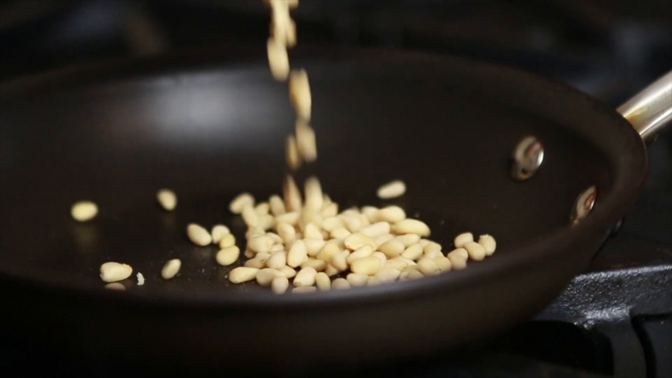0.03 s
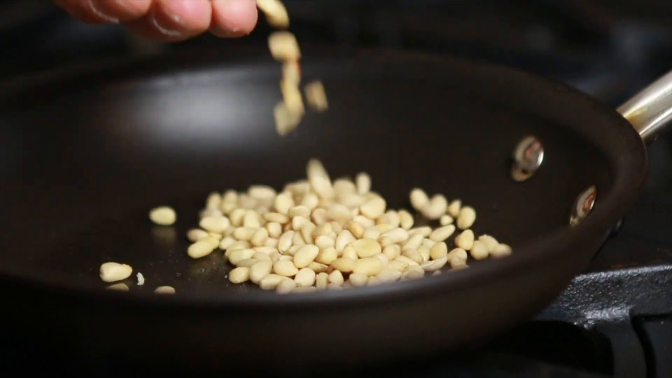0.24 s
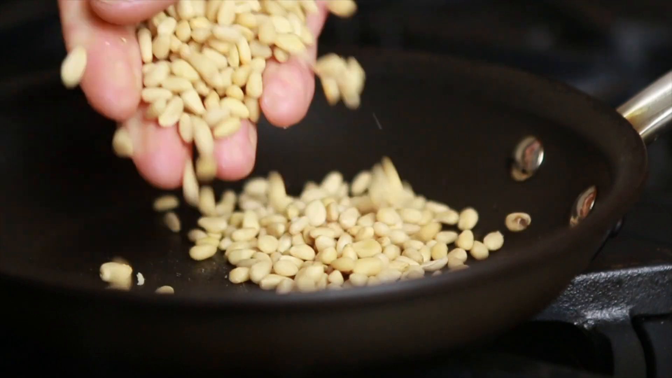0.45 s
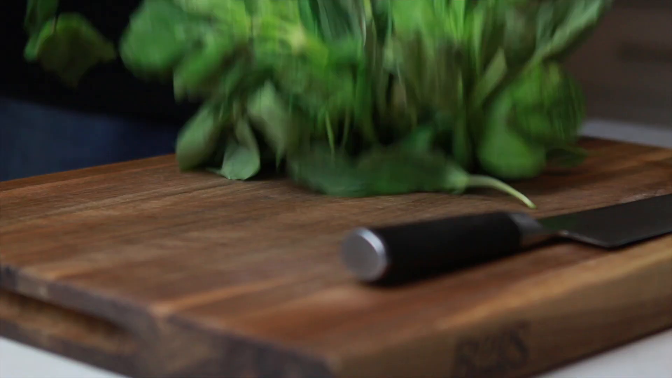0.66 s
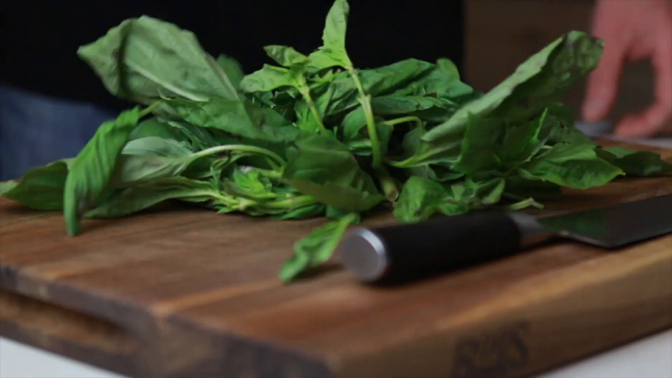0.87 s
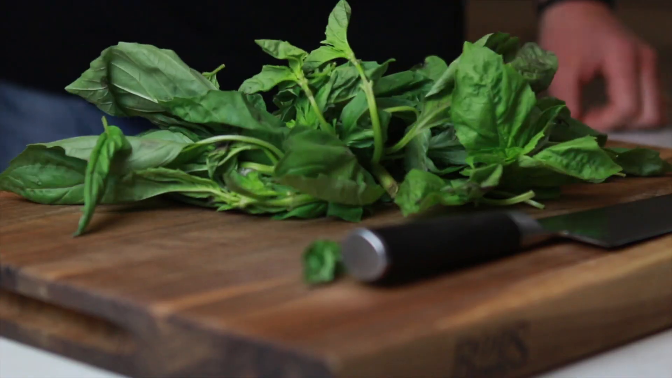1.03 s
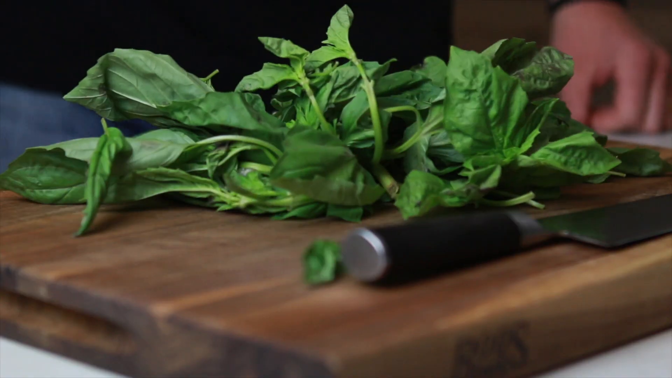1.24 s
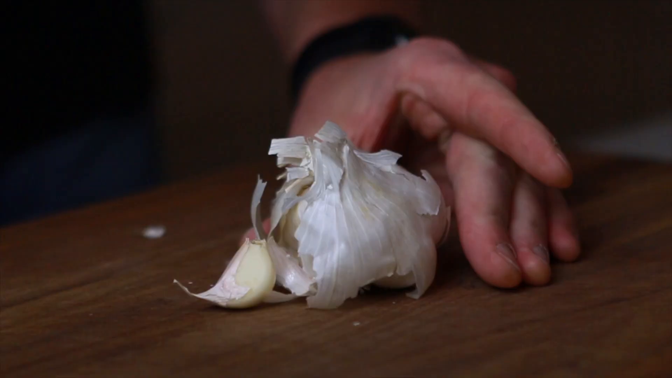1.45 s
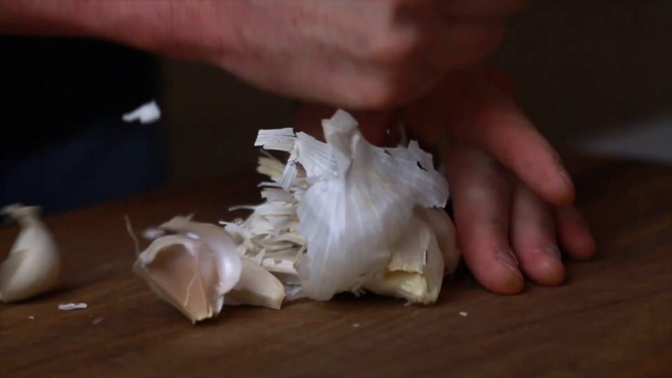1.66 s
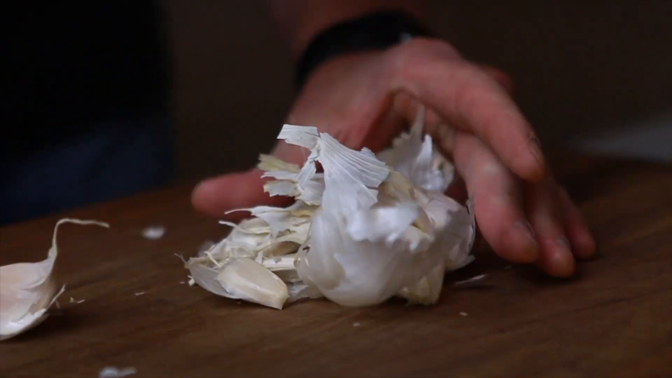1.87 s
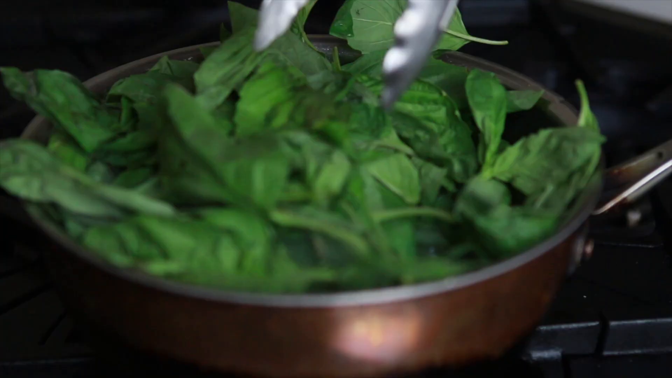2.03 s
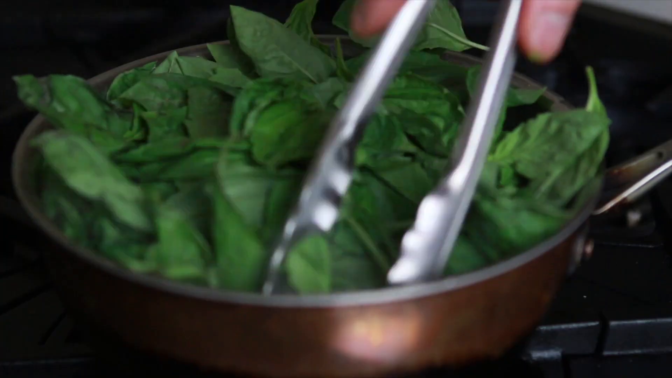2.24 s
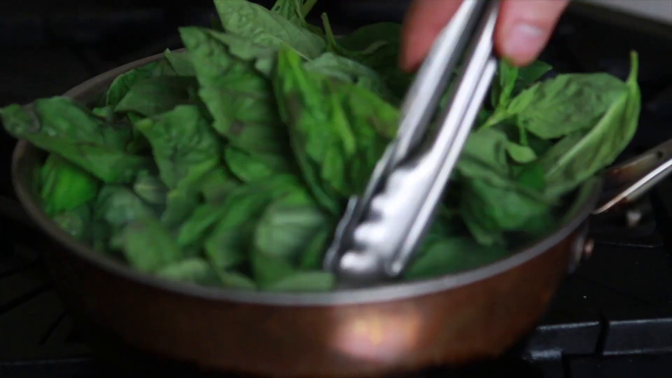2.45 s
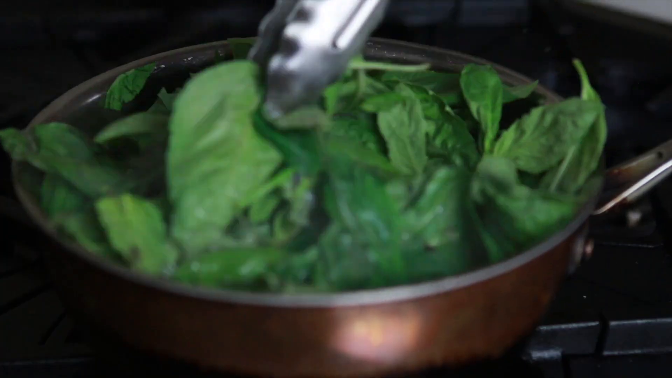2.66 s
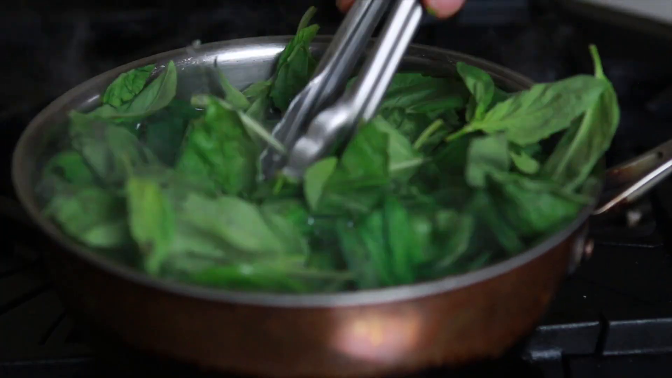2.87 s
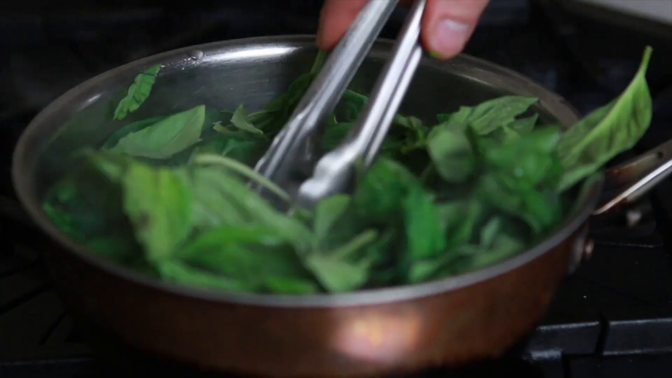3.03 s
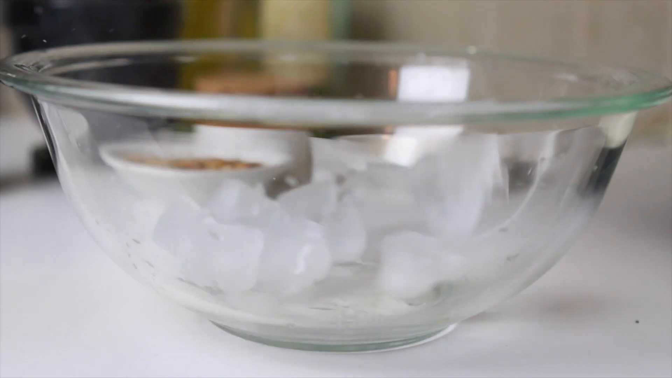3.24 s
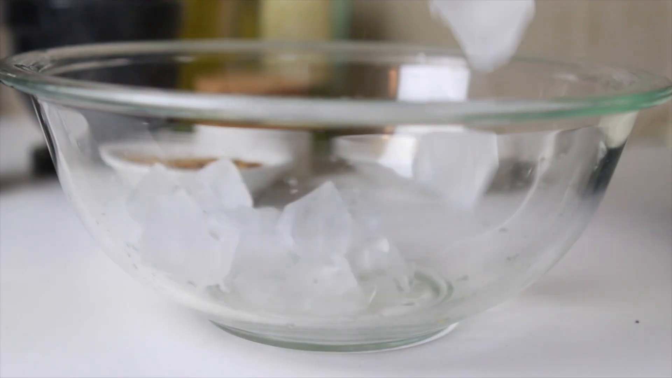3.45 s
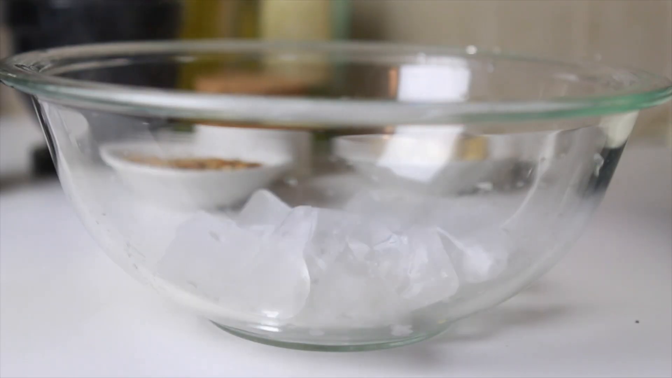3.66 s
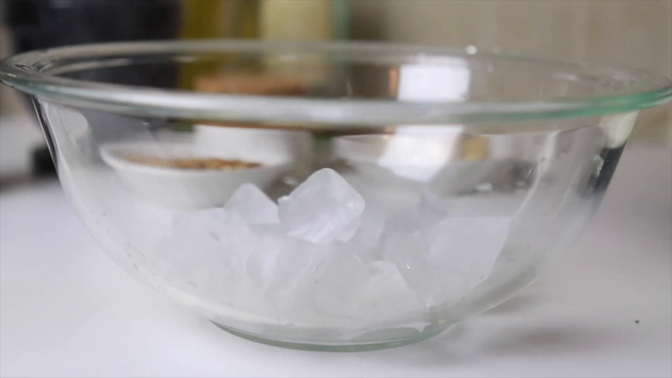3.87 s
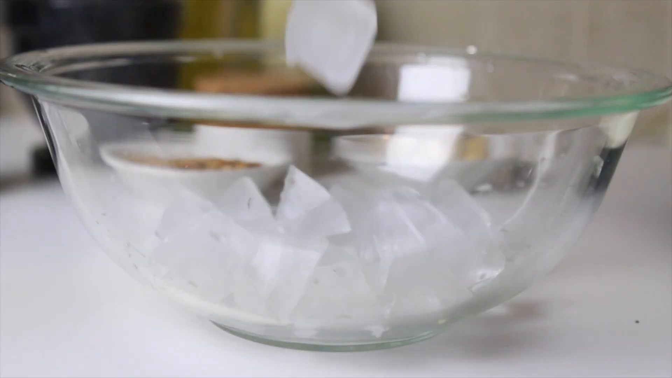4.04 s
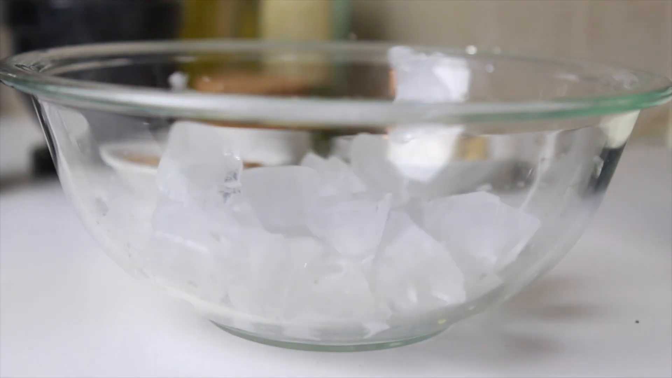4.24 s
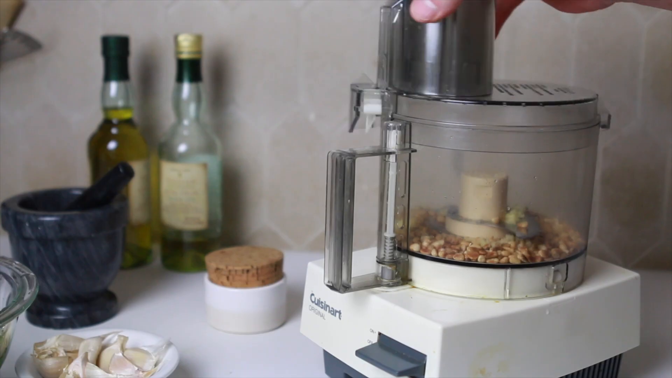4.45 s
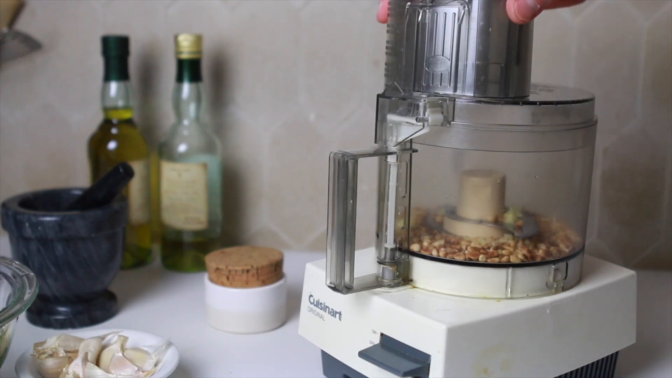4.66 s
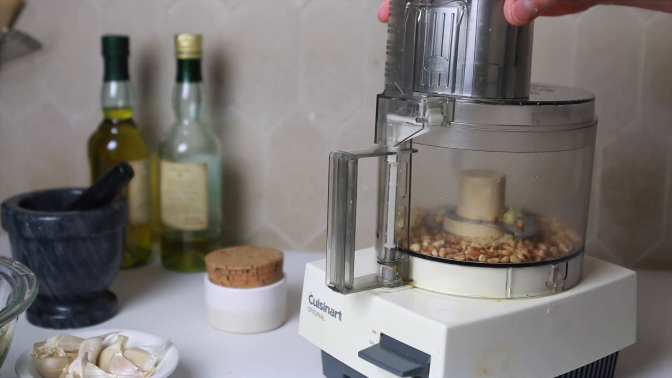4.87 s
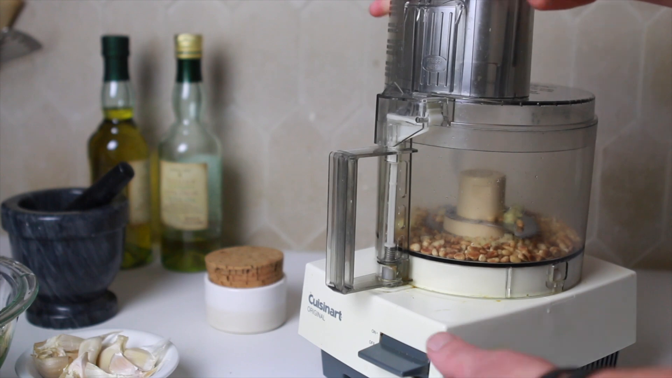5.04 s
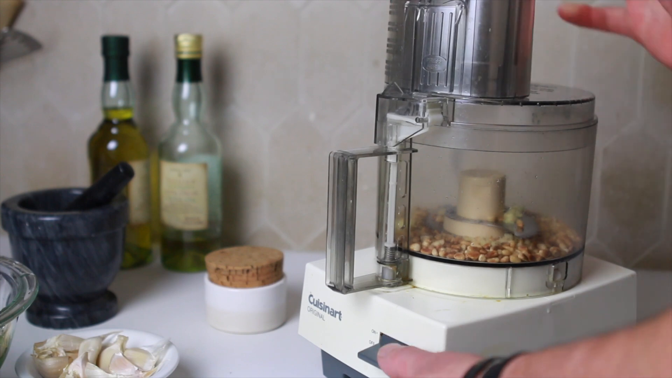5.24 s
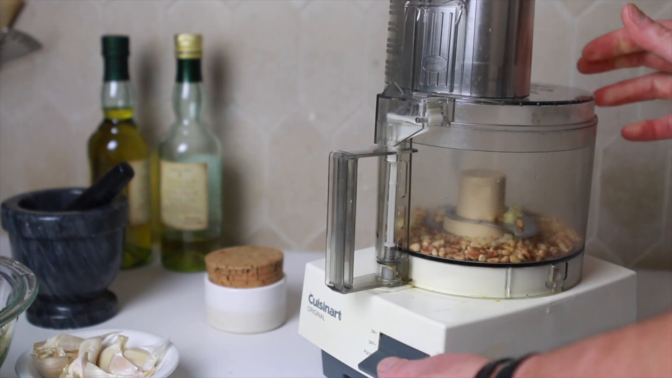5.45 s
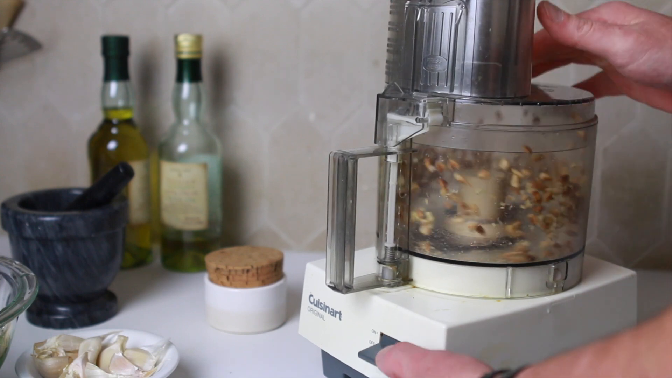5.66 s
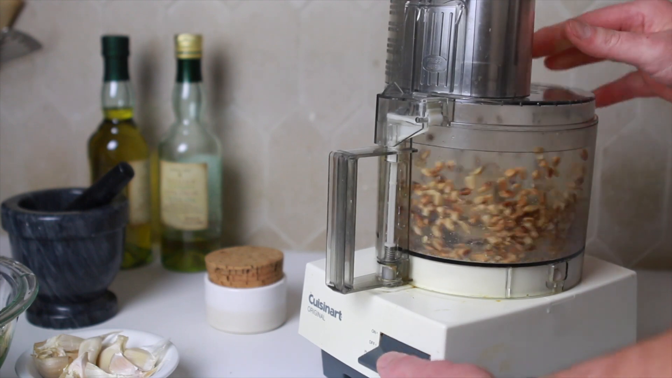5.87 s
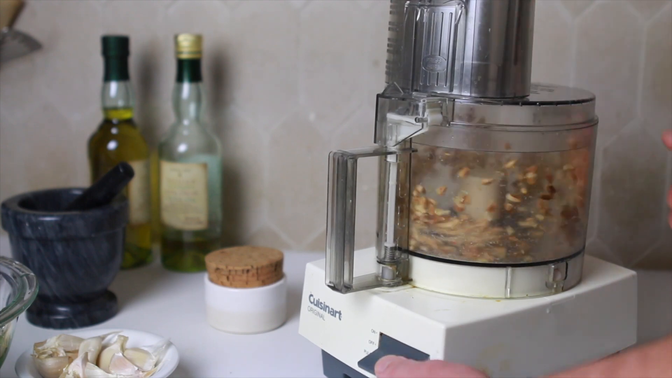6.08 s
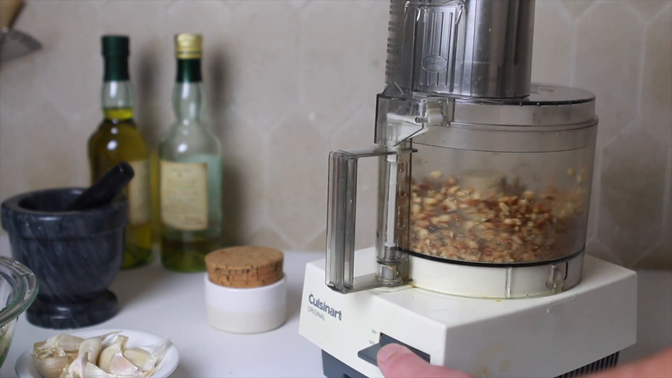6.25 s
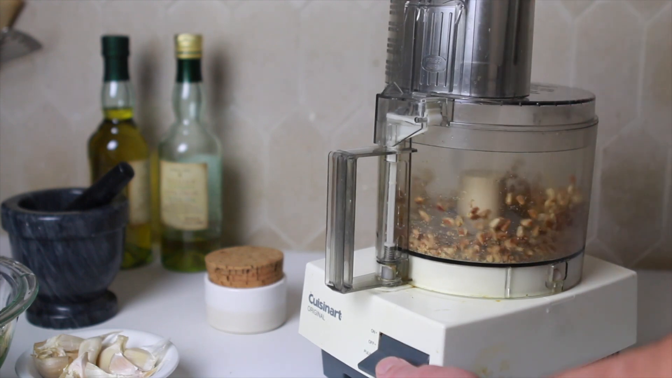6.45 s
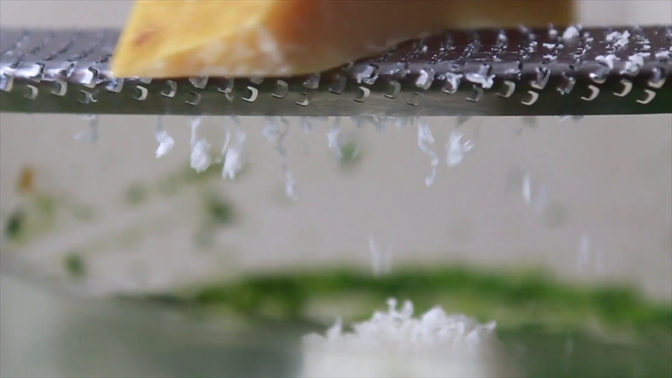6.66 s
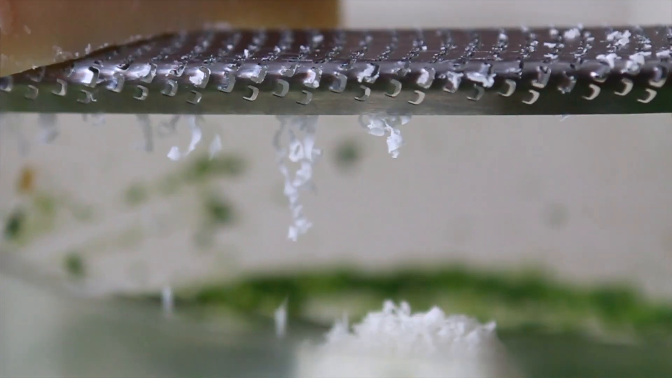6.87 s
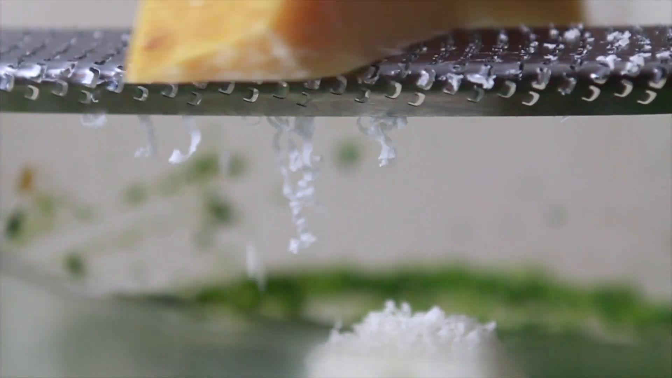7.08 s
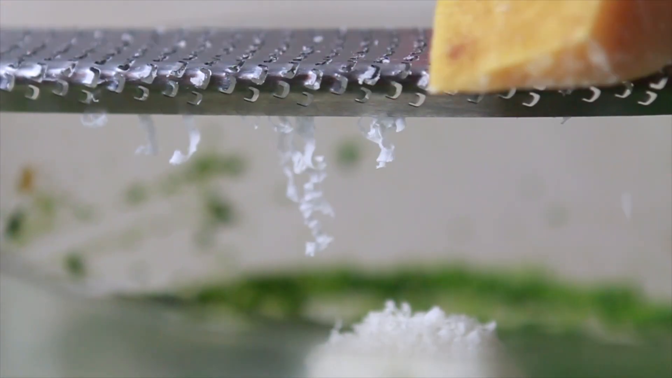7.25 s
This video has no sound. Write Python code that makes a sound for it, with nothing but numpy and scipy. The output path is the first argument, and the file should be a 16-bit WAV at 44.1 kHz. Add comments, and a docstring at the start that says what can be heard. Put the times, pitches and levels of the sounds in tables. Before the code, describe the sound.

Quick close kitchen sounds: pattering nuts, a garlic crack, simmering pan bumps, bright ice clinks, lid snap, two rattling blender bursts, soft grating.

```python
"""Kitchen work in quick succession

Nuts patter into a ringing skillet, basil flops on a board, garlic is crushed, tongs nudge a simmering pan,
ice tumbles into a glass bowl, a food processor is locked and pulsed twice, and cheese is drawn over a grater.
Contacts are clouds of random micro-impacts, coloured by a spectrum or driving resonances; hard bodies ring
as decaying sines, the motor and blades follow one speed curve, and decaying noise forms the room's reverberation.
"""
import sys
import numpy as np
from scipy import signal
from scipy.fft import rfft, irfft
from scipy.io import wavfile
from scipy.ndimage import uniform_filter1d

SR = 44100
rng = np.random.default_rng(int(sys.argv[2]) if len(sys.argv) > 2 else 0)


def store_wav(level_fs):
    """Save 16-bit WAV to argv[1]."""
    pcm = np.round(np.clip(np.atleast_2d(level_fs), -1, 1) * 32767)
    wavfile.write(sys.argv[1], SR, pcm.T.astype(np.int16))


N = 322371
T = np.arange(N) / SR  # seconds
AGE = T[:SR // 2]  # seconds since a contact began
NUTS_END_S, STOVE_START_S, ICE_START_S, ICE_END_S, GRATER_START_S = .652, 2.07, 3.19, 4.448, 6.53

# A relative_db column is further offset where it is used. Every spectrum lists: frequency_hz, level_db.
# Ice cubes striking: start_s, strength_db, clink_brightness_db
ICE_CUBES = [(3.1942, -32.5, -3), (3.206, -35, 6), (3.2287, -26.5, 6.5), (3.261, -27, 5.5),
             (3.2738, -32, 9), (3.3011, -28, 0), (3.325, -25.5, 5), (3.3727, -28.5, 7.5), (3.4193, -33, 5),
             (3.4434, -31.5, 1), (3.4496, -25, 7.5), (3.579, -28, -5), (3.5962, -26.5, -0.5),
             (3.6378, -25.5, 1), (3.6534, -27, -15), (3.736, -24.5, -7), (3.7439, -32, -14),
             (3.8794, -27.5, -4), (3.909, -31, -5), (3.9282, -37, -1), (4.007, -40.5, 13.5),
             (4.0349, -28, -7), (4.0464, -27, -3), (4.1041, -34, 3.5), (4.1707, -31.5, -14),
             (4.201, -32, -3), (4.2897, -30, -5.5), (4.313, -27.5, -3), (4.3375, -33.5, 1),
             (4.3511, -25.5, -18), (4.4167, -32.5, -4), (4.4406, -34.5, 1)]
# Spectra of the rattling ice heap and of the bowl's knock: frequency_hz, level_db
ICE_RATTLE_SPECTRUM = [(25, -30.5), (80, -16.5), (250, -14.5), (880, -1.5), (1400, -11), (3500, -7),
                       (7500, -11.5), (15500, -40)]
ICE_KNOCK_SPECTRUM = [(60, -53), (130, -11.5), (250, -26), (450, -6.5), (650, 0), (900, 3.5), (1150, -5),
                      (1700, -19), (4000, -53)]
# High modes of the glass bowl: pitch_hz, level_db, t60_s
GLASS_MODES = [(5600, -11, 0.11), (6880, 6.5, 0.1), (7350, 8.5, 0.16), (7330, 9.5, .1), (7950, -9, 0.17),
               (8960, 1, 0.12), (9900, -12.5, 0.3), (12370, -14, 0.32), (13130, -11, 0.22),
               (15570, -11, .15)]
# Blows on the bare bowl wall: start_s, first_mode_db, second_mode_db
WALL_BLOWS = [(3.231, -39, -35.5), (3.262, -40, -33.5), (3.463, -30, -32.5), (3.739, -32.5, -37),
              (4.008, -37.5, -39.5), (4.209, -42.5, -38), (4.351, -44, -38)]
# The wall's two lowest modes: pitch_hz, t60_s
WALL_MODES = [(1405.5, .9), (2617, .33)]
# Cubes squeaking as they slide: start_s, level_db, pitch_hz, length_s
ICE_SQUEAKS = [(3.279, -25.5, 3850, 0.038), (3.346, -25, 3840, 0.037), (3.414, -23, 4160, 0.013),
               (3.435, -27, 4090, 0.053), (3.544, -33, 3730, 0.02), (3.57, -33.5, 3540, 0.13)]
# High-pass keeping the ice and bowl sounds free of bass: frequency_hz, level_db
ICE_HIGH_PASS = [(20, -22), (60, -10), (120, 0), (16000, 0)]
# Presses of the pulse switch: on_s, off_s, first_bite_relative_db, cutoff_jolt_relative_db
PULSES = [(5.565, 5.797, -15, -41.5), (6.034, 6.23, -20, -32.5)]
# Resonances of the plastic jug: centre_hz, width_hz, level_db
JUG_RESONANCES = [(1810, 140, -5), (2420, 33, -12), (2610, 110, 3), (2740, 44, 4), (2960, 25, -5),
                  (3690, 52, 2.5), (3880, 25, -12), (4930, 150, -3)]
# Spectra of the chopped nuts and of the motor: frequency_hz, level_db
CHOP_SPECTRUM = [(200, -35), (450, -22.5), (850, -12), (1300, -10), (1800, -5), (2700, 1.5), (3900, -2),
                 (6400, -6), (8500, -13), (10500, -28.5), (15500, -39)]
MOTOR_SPECTRUM = [(30, -35), (70, -1.5), (140, -24), (230, -1), (300, -7.5), (378, 3), (450, -10),
                  (700, -10), (1500, -48)]
# Plastic lid and lever clicking: start_s, click_relative_db
LID_CLICKS = [(4.4554, -38.5), (4.526, -31.5), (4.5452, -38), (4.5695, -36), (4.591, -25), (4.6084, -23.5),
              (4.6352, -23), (4.6744, -15.5), (4.6884, -7.5), (4.6976, -19.5), (5.1376, -46),
              (5.1616, -36.5)]
# Switch ticks: start_s, level_db
SWITCH_TICKS = [(5.329, -55), (5.410, -58.5), (5.509, -61), (5.537, -38.5), (5.554, -40.5), (6.019, -34)]
# Spectra of the lid's click, its body and the thud of the lock: frequency_hz, level_db
LID_CLICK_SPECTRUM = [(400, -25.5), (900, -4), (2400, 2), (3600, 0), (4600, -6.5), (8300, -13),
                      (15500, -28.5)]
LID_BODY_SPECTRUM = [(40, -11.5), (78, 2), (120, -12), (215, 3), (400, -1), (650, 0.5), (1200, -4),
                     (2500, -40)]
LOCK_THUD_SPECTRUM = [(40, -22), (80, -7), (120, -11), (215, -1), (400, -1.5), (680, 4), (1200, -6),
                      (2500, -29.5)]
# Handfuls of nuts: start_s, length_s, patter_relative_db, bare_ring_relative_db, bare_ring_swell_s
HANDFULS = [(-0.03, 0.2, -38.5, -34.5, .06), (0.529, 0.097, -39.5, -38.5, .11)]
# Clumps of nuts landing: start_s, relative_db
NUT_CLUMPS = [(0.03, -24.5), (0.111, -36), (0.149, -30), (0.1842, -27), (0.25, -28.5), (0.4474, -31.5),
              (0.5454, -21.5), (0.565, -31), (0.6005, -27.5), (0.628, -31), (0.6355, -23)]
# Lowest skillet modes, then the higher ones: pitch_hz, level_db, t60_s
SKILLET_LOW_MODES = [(1558, 11, 0.27), (1630, -13, 0.46)]
SKILLET_MODES = [(2670, -8, .17), (3115, -12.5, .35), (4580, -11, .15), (4750, -12, 0.17), (4950, -17, .25),
                 (6575, -3, 0.17), (7030, -3, .07), (7500, -10, 0.064), (8360, -3, .07),
                 (9620, -1.5, 0.089), (11570, -7, .12)]
# Spectrum of a nut's tick: frequency_hz, level_db
NUT_SPECTRUM = [(100, -11.5), (400, -17), (800, -18.5), (1300, -10), (2000, -6), (4500, -0.5), (7000, -2),
                (10500, -9.5), (15500, -21)]
# Garlic skin cracking: start_s, level_db, swell_s, t60_s
GARLIC_CRACKS = [(1.632, -20, 0.0067, 0.012), (1.640, -15.5, 0.002, 0.017), (1.662, -56, 0.0037, 0.16),
                 (1.706, -38, 0.0028, 0.049), (1.820, -39.5, 0.0018, 0.03), (1.877, -35, 0.0013, 0.064),
                 (1.898, -38, 0.0021, 0.024), (2.012, -47.5, 0.002, 0.094)]
# Spectrum of the skin: frequency_hz, level_db
SKIN_SPECTRUM = [(400, -9.5), (900, 0), (1500, -9), (2000, -7.5), (3600, -10), (6400, -3), (15500, -12)]
# Cutting board modes: pitch_hz, level_db, t60_s
BOARD_MODES = [(118, -7, 0.085), (320, -17, 0.054), (645, -1.5, 0.017), (733, -1, 0.043),
               (883, -3.5, 0.032), (1164, -6, 0.024)]
# Basil settling: start_s, level_db, swell_s, t60_s
LEAVES = [(0.736, -43, 0.0044, 0.28), (.765, -42.5, 0.0096, .22), (1.161, -62.5, 0.011, 0.46),
          (1.23, -60, 0.014, 0.36)]
# Spectrum of the leaves: frequency_hz, level_db
LEAF_SPECTRUM = [(60, -12), (350, -13), (600, -7), (2800, -8), (6700, -13.5), (15500, -28)]
# Soft bumps on the board: start_s, relative_db
BOARD_BUMPS = [(0.951, -48), (0.971, -48), (1.484, -63.5), (1.511, -65), (1.604, -75.5)]
# Strokes over the grater: start_s, length_s, rasp_relative_db, hiss_relative_db
STROKES = [(6.547, 0.46, -47, -47.5), (7.018, 0.22, -45, -56.5)]
# Cheese catching on the teeth: start_s, relative_db
CHEESE_CATCHES = [(6.564, -35), (6.697, -40), (6.762, -40), (6.876, -30), (6.883, -26), (6.888, -28.5),
                  (7.071, -33.5), (7.121, -39), (7.145, -41)]
# Spectra of the rasp, the cutting hiss and a catch: frequency_hz, level_db
RASP_SPECTRUM = [(60, -16), (180, -9.5), (350, -1.5), (520, 2), (850, -8.5), (1600, -15.5), (3000, -47)]
GRATE_HISS_SPECTRUM = [(500, -22), (1000, -11), (3100, -5), (7300, -13), (15000, -32)]
CATCH_SPECTRUM = [(150, -32), (600, -4.5), (1800, 0.5), (4500, -12), (14000, -43)]
# Tongs nudging the pan: start_s, level_db, resonance_hz, swell_s
PAN_NUDGES = [(2.086, -40, 313, .003), (2.271, -45.5, 227, .01), (2.324, -47, 81, .009),
              (2.496, -30.5, 300, .003), (2.52, -42, 257, .011), (2.6, -31.5, 360, .008),
              (2.635, -36, 540, .007), (2.68, -39, 467, .01), (2.755, -31, 305.3, .003),
              (2.787, -22, 396, .008), (2.82, -25, 510, .005), (2.974, -39.5, 296, .012)]
# Tong tips on the rim: start_s, relative_db
TONG_TAPS = [(2.3007, -20.5), (2.4984, -26), (2.7566, -25)]
# Modes of the tongs: pitch_hz, level_db, t60_s
TONG_MODES = [(2165, 26, 0.03), (3020, 0, 0.04), (5570, -8, 0.196), (7130, 15, 0.073), (8260, -2, .1),
              (10200, -8, 0.11)]
# Spectra of the damped pan, the tips' scrape and the simmering water: frequency_hz, level_db
PAN_SPECTRUM = [(40, -9), (90, -7), (180, -16.5), (330, -17.5), (730, -12), (1360, -13), (3000, -18.5),
                (8000, -36.5), (15000, -45)]
TONG_SCRAPE_SPECTRUM = [(500, -11), (2000, -3), (4000, 1.5), (7000, 1.5), (10000, -2.5), (15500, -11)]
STEAM_SPECTRUM = [(30, 4), (300, -8), (900, -6), (1600, -6.5), (3100, -11.5), (4400, -17), (15500, -24.5)]
# Spectra of the quiet room and of the air heard along with the grater: frequency_hz, level_db
QUIET_SPECTRUM = [(30, 0.5), (160, 0.5), (330, -2), (700, -1.5), (2000, -8.5), (9400, -13.5)]
AIR_SPECTRUM = [(30, 6.5), (300, -0.5), (1800, -8.5), (15500, -16.5)]

# Parts of one ice blow, relative to its strength
CLINK_DB, KNOCK_DB, ICE_CRACK_DB = 1.5, .5, -6
# Every blow stirs the heap, which then settles; small clinks jostle within it
HEAP_DB, HEAP_SWELL_S, HEAP_T60_S, JOSTLE_DB = -11, 0.02, 0.47, -6
# The heap gives way and slides
SLUMP_S, SLUMP_RELATIVE_DB, SLUMP_SWELL_S, SLUMP_T60_S = 4.24, -27.5, 0.051, 0.5
# Blades: time to full speed, from there to rest, and shaft turns per second
SPIN_UP_S, COAST_S, SHAFT_HZ = 0.024, 0.28, 29.8
BITE_DELAY_S, BITE_WIDTH_S = 0.065, 0.032  # the blades' first bite into the resting nuts
# Drives at full speed, before each layer's mix gain, and how chips and motor grow with speed
CHOP_RELATIVE_DB, CHIPS_RELATIVE_DB, MOTOR_RELATIVE_DB = -23.5, -38.5, -45.5
CHIPS_POWER, MOTOR_POWER = 3.4, 0.99
# The housing jolts as the motor starts and cuts out
JOLT_ON_RELATIVE_DB, JOLT_SWELL_S, JOLT_T60_S = -34, 0.022, 0.13
# The housing's share of a click; dB gained per dB of click
LID_BODY_DB, LID_BODY_GROWTH = -27, 0.54
LOCK_S, LOCK_DB = 4.695, -22  # the lid thuds home
# After a handful, stragglers land on the heap while the bare skillet's ring dies sooner
PATTER_SWELL_S, PATTER_T60_S, BARE_T60_S = 0.01, 1.8, 0.63
HISS_POWER = 3  # the teeth only hiss when the cheese moves fast
SIMMER_DB, SIMMER_RISE_DB_PER_S = -54.5, 8.5  # the pan heats up
NUDGE_T60_S = 0.23
TOP_HZ = 15800


def ice():
    """Impact excitation of modes: cubes clink, knock the bowl, squeak and settle; wall blows leave it singing."""
    stir_power = sum((amp(db) * envelope(s, HEAP_SWELL_S, HEAP_SWELL_S, HEAP_T60_S)) ** 2 for s, db, _ in ICE_CUBES)
    stir = np.sqrt(stir_power)
    slump = amp(SLUMP_RELATIVE_DB) * envelope(SLUMP_S, SLUMP_SWELL_S, SLUMP_SWELL_S, SLUMP_T60_S)
    rattle = colour(through(grains(420, 4.1), burst(t60=0.02)), ICE_RATTLE_SPECTRUM)
    out = unit(rattle) * np.hypot(stir * amp(HEAP_DB), slump)

    for when, pitch, weakness in rng.random((70, 3)):
        s = ICE_START_S + when * (ICE_END_S - ICE_START_S)
        hz = 3400 + 7500 * pitch
        stir_db = 20 * np.log10(stir[int(s * SR)] + 1e-6)
        clink = ring([(hz, 0, .06), (hz * 1.37, -4, .04)])
        add(out, s, JOSTLE_DB - 10 * weakness + stir_db, clink)

    for s, db, bright_db in ICE_CUBES:
        # every cube has its own short, high notes
        cube = ring([(hz, -12 * np.log2(hz / 7000), .07) for hz in rng.uniform(5500, 13000, size=7)])
        chip = colour(burst(t60=0.062), [(2500, -50.0), (7000, 10.5), (15000, -3.5)])
        glass = ring(GLASS_MODES, scatter_db=7)
        clink = amp(-1.5) * crest(chip) + amp(1.0) * crest(cube) + amp(-0.5) * crest(glass)
        knock = colour(burst(t60=0.037, rate=3000), ICE_KNOCK_SPECTRUM)
        crack = colour(burst(t60=0.1), [(1000, -20.5), (2400, -6.5), (4200, -3), (8000, -22)])
        add(out, s, db + bright_db + CLINK_DB, clink)
        add(out, s, db + KNOCK_DB, knock)
        add(out, s, db + ICE_CRACK_DB, crack)

    for s, db, hz, length in ICE_SQUEAKS:
        slide = np.sin(np.pi * np.minimum(AGE / length, 1)) * grains(8000, 2.2, size=len(AGE))
        add(out, s, db, resonate(resonate(slide, hz, 110), hz, 300))
    out = kitchen(out, wet_db=-10.0, decay_scale_s=0.73)

    ends = [row[0] for row in WALL_BLOWS[1:]] + [ICE_END_S]
    for (s, *levels), end in zip(WALL_BLOWS, ends):
        age = np.maximum(T - s, 0)
        # each new blow takes over the wall's two lowest modes
        for (hz, t60), db in zip(WALL_MODES, levels):
            decay = np.sqrt(2) * amp(db - 60 * age / t60)
            out += decay * np.sin(2 * np.pi * hz * age) * between(s, end)
    return colour(out, ICE_HIGH_PASS) * between(ICE_START_S, ICE_END_S)


def processor():
    """Forced vibration: spinning blades fling pieces at the jug in an uneven rattle; the motor shakes its housing."""
    speed = blade_speed()
    bite = sum(amp(db) * np.exp(-((T - on - BITE_DELAY_S) / BITE_WIDTH_S) ** 2) for on, _, db, _ in PULSES)
    jolts = 0
    for on, off, _, off_db in PULSES:
        for s, db in ((on, JOLT_ON_RELATIVE_DB), (off - JOLT_SWELL_S, off_db)):
            jolts = jolts + amp(db) * envelope(s, JOLT_SWELL_S, JOLT_SWELL_S, JOLT_T60_S)

    chop = np.hypot(amp(CHOP_RELATIVE_DB) * speed, bite)
    chips = np.hypot(amp(CHIPS_RELATIVE_DB) * speed ** CHIPS_POWER, amp(-18.5) * bite)
    running = amp(MOTOR_RELATIVE_DB) * speed ** MOTOR_POWER
    drive = np.sqrt(running ** 2 + jolts ** 2 + (amp(-20) * bite) ** 2)

    wander = unit(uniform_filter1d(rng.standard_normal(N), size=6000))
    turn = 2 * np.pi * np.cumsum(SHAFT_HZ * (1 + 0.0089 * wander)) / SR
    # the pieces leave the blades in uneven handfuls, with only a slight swing at twice the shaft rate
    unevenness = unit(uniform_filter1d(rng.standard_normal(N), size=200))
    handfuls = amp(0.49 * np.sin(2 * turn) + 1.3 * unevenness)
    hits = grains(4000, 0.96) * handfuls
    jug = sum(amp(db) * resonate(hits, hz, width) for hz, width, db in JUG_RESONANCES)
    pieces = colour(grains(4500, 1.9) * handfuls, CHOP_SPECTRUM)
    rattle = chop * (amp(-1.5) * unit(pieces) + amp(-7.0) * unit(jug))
    spray = chips * amp(-1.5) * unit(colour(grains(2900, 3.1), [(6000, -2), (11000, 3.5), (16000, -4)]))

    hum = resonate(resonate(grains(1500, 3.5), 372, 22), 376, 84)  # the housing's main resonance
    shake = colour(grains(1500, 3.4), MOTOR_SPECTRUM)
    motor = drive * (amp(0.5) * unit(shake) + amp(-4.5) * unit(hum))
    wet = kitchen(rattle + spray, wet_db=-14.0, decay_scale_s=0.15)
    return (wet + motor) * between(5.568, GRATER_START_S)


def blade_speed():
    """Acceleration and friction: share of full speed, rising while the switch is held, then falling evenly."""
    runs = []
    for on, off, _, _ in PULSES:
        spin_up = np.clip((T - on) / SPIN_UP_S, 0, 1)
        coast = np.clip(1 - (T - off) / COAST_S, 0, 1)
        runs.append(spin_up * coast)
    return np.max(runs, axis=0)


def lid():
    """Impact and sliding friction: the plastic lid scrapes and snaps into its lock; a finger finds the switch."""
    out, ticks = np.zeros(N), np.zeros(N)
    for s, click_db in LID_CLICKS:
        add(out, s, click_db - 8.5, colour(burst(t60=0.075, rate=4500), LID_CLICK_SPECTRUM))
        body = colour(burst(t60=0.11, swell=0.00073), LID_BODY_SPECTRUM)
        add(out, s, LID_BODY_DB + LID_BODY_GROWTH * click_db, body)
    add(out, LOCK_S, LOCK_DB, colour(burst(t60=0.053, swell=0.0015), LOCK_THUD_SPECTRUM))
    # plastic scuffs on plastic, harder as the lid nears its lock
    scuff = burst(t60=0.089, swell=.17, rate=2400)
    scuff_body = unit(colour(scuff, LID_BODY_SPECTRUM))
    scuff_edge = unit(colour(scuff, LID_CLICK_SPECTRUM))
    add(out, 4.49, -38, scuff_body + amp(-5.5) * scuff_edge)
    for s, db in SWITCH_TICKS:
        add(ticks, s, db, colour(burst(t60=0.066), [(1000, 1.0), (6000, 2), (15000, -7.5)]))
    return kitchen(out, wet_db=-14.0, decay_scale_s=0.93) + kitchen(ticks, wet_db=-18)


def nuts():
    """Impact excitation: nuts tick together and ring the skillet, less so as the heap covers it."""
    patter = sum(amp(db) * envelope(s, PATTER_SWELL_S, length, PATTER_T60_S) for s, length, db, _, _ in HANDFULS)
    bare = sum(amp(db) * envelope(s, swell, length, BARE_T60_S) for s, length, _, db, swell in HANDFULS)
    hits = unit(through(grains(204, 1.3), burst(t60=0.019))) * patter * amp(-1.5)
    for s, db in NUT_CLUMPS:
        add(hits, s, db - 6, burst(t60=0.043, rate=2300))
    ticks = colour(hits, NUT_SPECTRUM)
    modes = ring(SKILLET_MODES)
    metal = through(ticks, modes / np.linalg.norm(modes))
    # the lowest pair never dies between nuts: it beats and wavers
    base = resonate(through(grains(150, 3.5), ring(SKILLET_LOW_MODES)), 1590, 370)
    base = base / np.sqrt(uniform_filter1d(base ** 2, size=3000) + 1e-6)
    wet = kitchen(amp(3.5) * ticks + amp(-3) * metal, wet_db=-7.0)
    return (wet + base * bare * amp(-1.0)) * between(0, NUTS_END_S)


def board_work():
    """Fracture and impact: basil flops onto the board; a palm bursts the garlic bulb and thumps the wood."""
    leaves, garlic = np.zeros(N), np.zeros(N)
    for s, db, swell, t60 in LEAVES:
        add(leaves, s, db, colour(burst(t60, swell, rate=3400), LEAF_SPECTRUM))
    for s, db in BOARD_BUMPS:
        add(leaves, s, db - 5.0, resonate(resonate(burst(t60=0.02), 520, 70), 520, 500))
    for s, db, swell, t60 in GARLIC_CRACKS:
        add(garlic, s, db, colour(burst(t60, swell, rate=7900), SKIN_SPECTRUM))
    add(garlic, 1.636, -18, ring(BOARD_MODES) * np.minimum(AGE / 0.0023, 1))
    # the cloves tear from the stem, duller than the skin
    tear = burst(t60=0.075, swell=0.0062)
    add(garlic, 1.635, -21, resonate(resonate(tear, 3600, 2600), 2600, 3500))
    # the board's boom hangs in the room
    boom = burst(t60=0.71, swell=0.0051)
    low_boom = unit(resonate(resonate(boom, 715, 90), 715, 400))
    high_boom = unit(resonate(resonate(boom, 1000, 300), 1080, 500))
    add(garlic, 1.645, -34, low_boom + amp(-3.5) * high_boom)
    return kitchen(leaves, wet_db=-9) + kitchen(garlic, wet_db=-11.0)


def grater():
    """Stick-slip friction: cheese shakes the blade that it damps; each stroke speeds up and slows."""
    rasp, hiss = 0, 0
    for s, length, rasp_db, hiss_db in STROKES:
        speed = np.abs(np.sin(np.pi * np.clip((T - s) / length, 0, 1)))
        rasp = rasp + amp(rasp_db) * speed
        hiss = hiss + amp(hiss_db) * speed ** HISS_POWER
    out = rasp * amp(-1.5) * unit(colour(grains(260, 2.0), RASP_SPECTRUM))
    out += hiss * amp(-6.0) * unit(colour(grains(1300, 5), GRATE_HISS_SPECTRUM))
    for s, db in CHEESE_CATCHES:
        add(out, s, db - 8.5, colour(burst(t60=0.037, swell=0.0011), CATCH_SPECTRUM))
    air = amp(-57) * unit(colour(rng.standard_normal(N), AIR_SPECTRUM)) * (T > GRATER_START_S)
    return kitchen(out, wet_db=-7.0, decay_scale_s=0.65) + air


def stove():
    """Damped resonance and bubble noise: tongs bump the full pan while its water simmers ever louder."""
    out = np.zeros(N)
    for s, db, hz, swell in PAN_NUDGES:
        push = colour(burst(NUDGE_T60_S, swell), PAN_SPECTRUM)
        add(out, s, db, unit(resonate(push, hz, hz * 0.28)) + amp(-10.0) * unit(push))
    for s, db in TONG_TAPS:
        scrape = colour(burst(t60=0.05, swell=0.004), TONG_SCRAPE_SPECTRUM)
        add(out, s, db - 15, crest(ring(TONG_MODES)) + amp(4) * crest(scrape))
    heat = amp(SIMMER_DB + SIMMER_RISE_DB_PER_S * (T - STOVE_START_S))
    fizz = unit(colour(grains(7000, 2.9), STEAM_SPECTRUM)) * heat * between(STOVE_START_S, ICE_START_S)
    return kitchen(out, wet_db=-6, decay_scale_s=0.72) + fizz


def quiet_room():
    """Stationary noise: a faint steady floor, stronger in the bass."""
    return amp(-67.5) * unit(colour(rng.standard_normal(N), QUIET_SPECTRUM))


def kitchen(x, wet_db, decay_scale_s=1.0):
    """Reverberation: hard walls give a dense tail, shorter in the treble."""
    age, tail = T[:SR], 0
    for low, high in [(40, 400), (400, 4000), (4000, 8000), (8000, 17000)]:  # Hz
        band_pass = signal.butter(2, [low, high], "band", fs=SR, output="sos")
        band = signal.sosfilt(band_pass, rng.standard_normal(SR))
        tail = tail + band * amp(-60 * age / decay_scale_s * (1.5 + low / 9000))
    tail = tail * np.clip((age - .003) / 0.0022, 0, 1)
    return x + amp(wet_db) * through(x, tail / np.linalg.norm(tail))


def grains(rate, spread_db, size=N):
    """Shot noise: random tiny impacts of unequal strength, rate per second, rms 1."""
    hit = rng.random(size) < rate / SR
    strength = amp(spread_db * np.clip(rng.standard_normal(size), -2, 2))
    return unit(hit * rng.choice([-1, 1], size) * strength)


def burst(t60, swell=0.00061, rate=12000):
    """Contact noise: a cloud of micro-impacts that swells and dies, times in seconds."""
    shape = np.minimum(AGE / swell, 1) * amp(-60 * np.maximum(AGE - swell, 0) / t60)
    return shape * grains(rate, 4.2, size=len(AGE))


def ring(modes, scatter_db=0):
    """Modal superposition: decaying sines, their balance scattered by where the blow lands."""
    out = 0
    for hz, db, t60 in modes:
        decay = amp(db + scatter_db * rng.standard_normal() - 60 * AGE / t60)
        out = out + decay * np.sin(2 * np.pi * hz * AGE)
    return out


def resonate(x, hz, width_hz):
    """Simple resonance: one peak with gain 1 at its centre."""
    b, a = signal.iirpeak(min(hz, .45 * SR), hz / min(width_hz, SR / 4), fs=SR)
    return signal.lfilter(b, a, x)


def colour(x, points):
    """Minimum-phase filtering: a causal filter with the given spectrum, by folding its cepstrum."""
    hz, db = np.transpose(points)
    f = np.linspace(1, SR / 2, 2049)
    cepstrum = irfft(np.log(amp(np.interp(np.log(f), np.log(hz), db))))
    half = len(cepstrum) // 2
    cepstrum[1:half] *= 2
    cepstrum[half + 1:] = 0
    return through(x, irfft(np.exp(rfft(cepstrum))))


def through(x, response):
    """Convolution: drive a body that has this impulse response."""
    return signal.fftconvolve(x, response)[:len(x)]


def envelope(start, swell, hold, t60):
    """Exponential decay: swell, hold until this long after the start, then die away."""
    return np.clip((T - start) / swell, 0, 1) * amp(-60 * np.maximum(T - start - hold, 0) / t60)


def between(start, end):
    """Gating: one from start to end, with 2 ms edges."""
    return np.clip((T - start) / .002, 0, 1) * np.clip((end - T) / .002, 0, 1)


def add(track, s, db, sound):
    """Superposition: lay a sound into the track at s seconds, at this level in its loudest 6 ms."""
    start = max(int(s * SR), 0)
    track[start:start + len(sound)] += amp(db) * crest(sound)[:N - start]


def crest(x):
    """Short-time level: scale the loudest 6 ms to rms 1."""
    return x / np.sqrt(uniform_filter1d(x ** 2, size=264).max())


def unit(x):
    """Mean power: scale to rms 1."""
    return x / np.std(x)


def amp(db):
    """Logarithmic level: decibels to gain."""
    return 10 ** (np.asarray(db) / 20)


def scene():
    """Superposition of all jobs over the quiet room, twice as strong on the left."""
    mono = nuts() + board_work() + stove() + ice() + lid() + processor() + grater() + quiet_room()
    return np.outer([4 / 3, 2 / 3], mono)


def record(dry):
    """Soft saturation rounds the loudest peaks; a steep low-pass filter cuts the top."""
    rounded = .85 * np.tanh(dry / .85)
    low_pass = signal.ellip(10, .1, 80, TOP_HZ, fs=SR, output="sos")
    return signal.sosfilt(low_pass, rounded)


dry = scene()
out = record(dry)
store_wav(out)
```